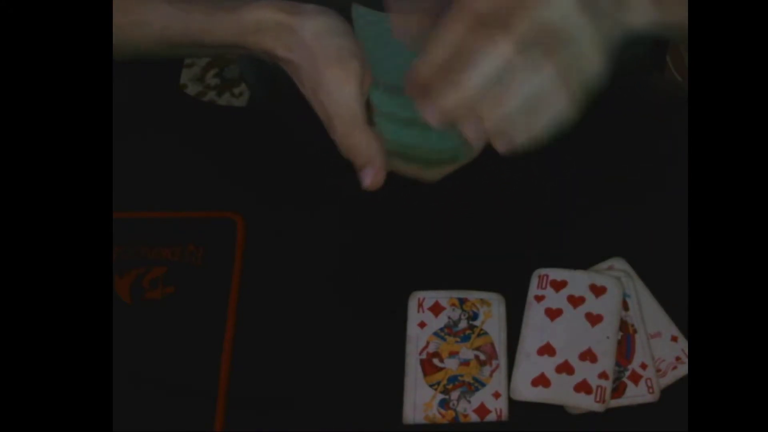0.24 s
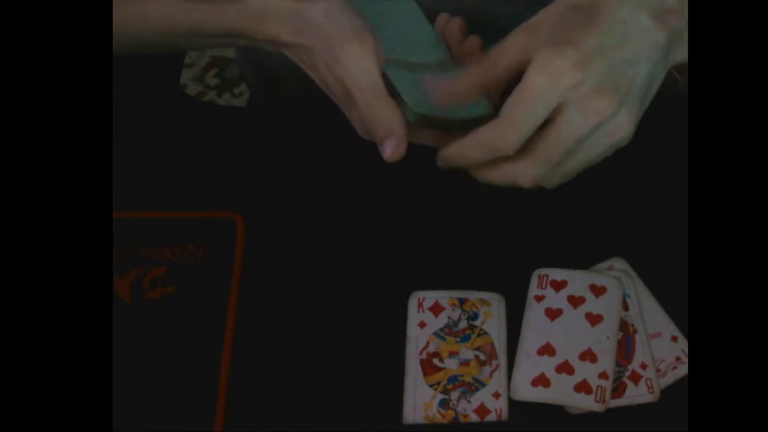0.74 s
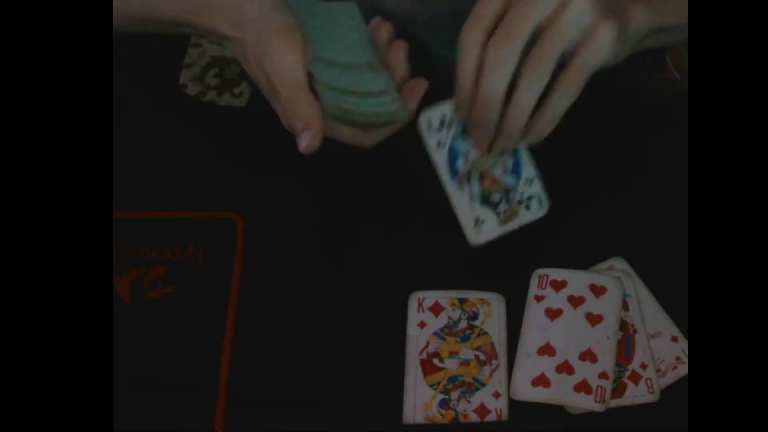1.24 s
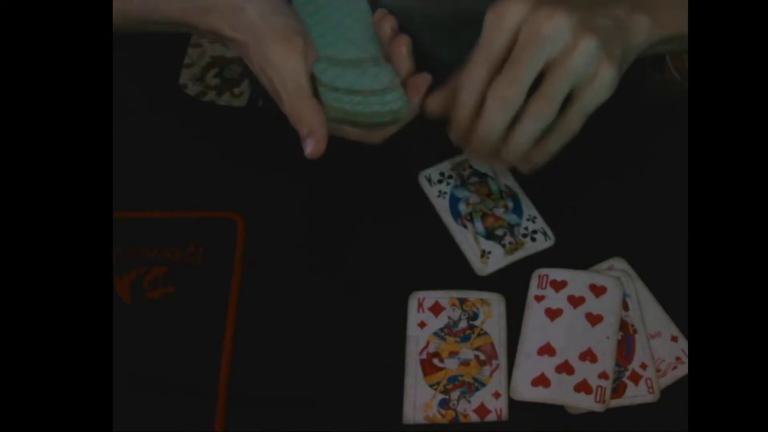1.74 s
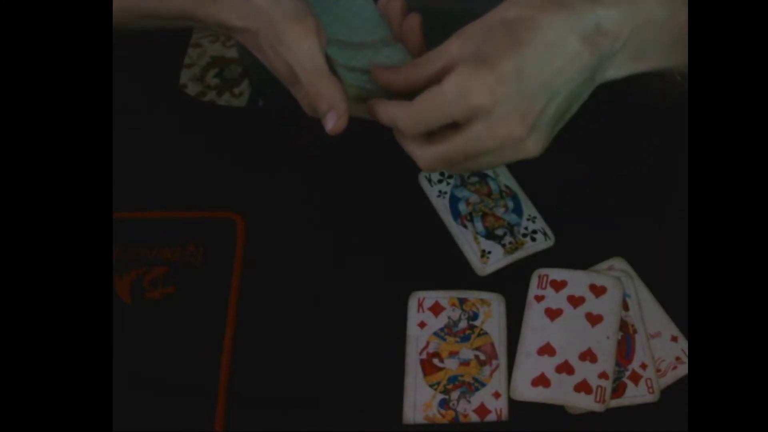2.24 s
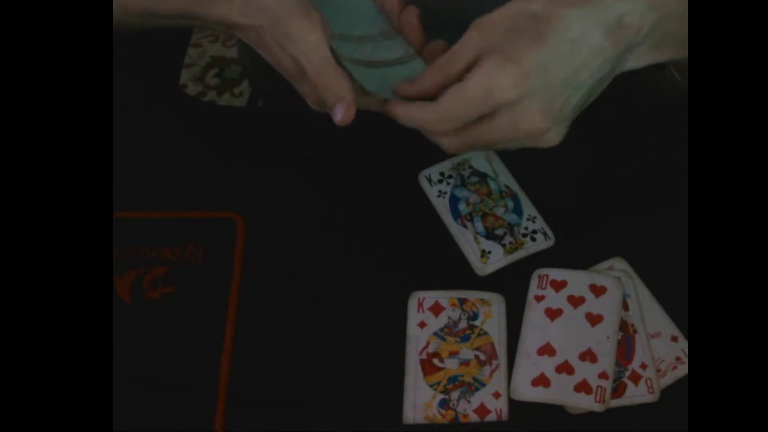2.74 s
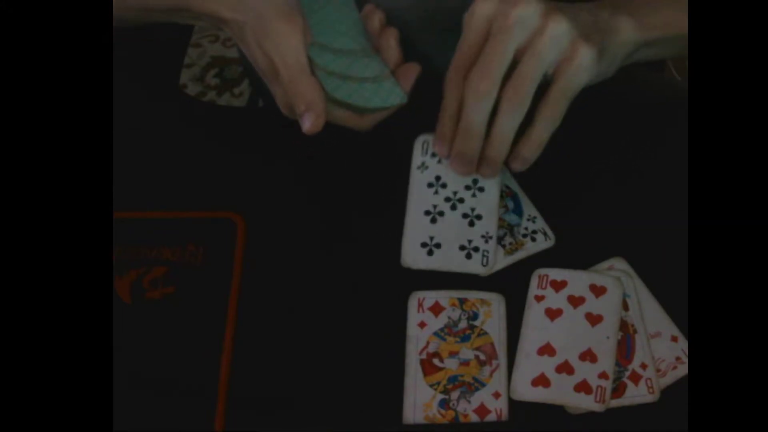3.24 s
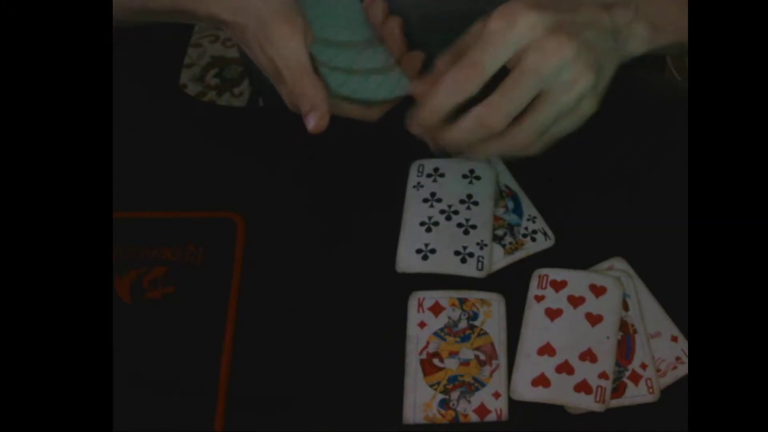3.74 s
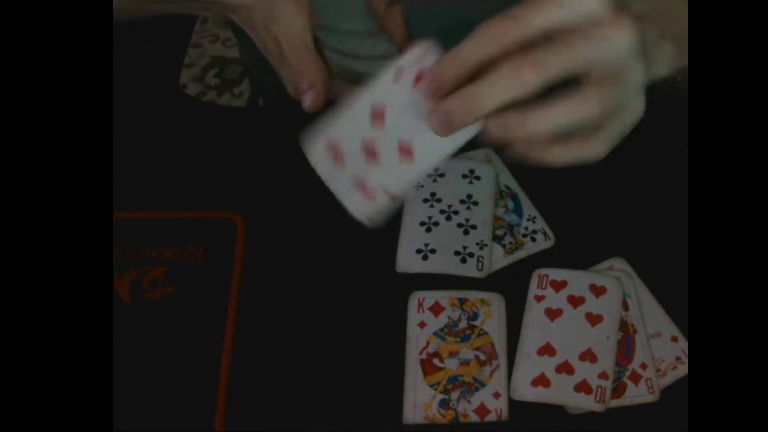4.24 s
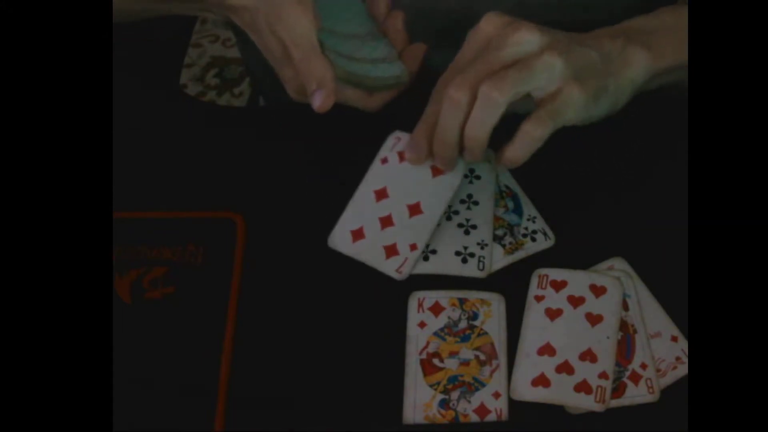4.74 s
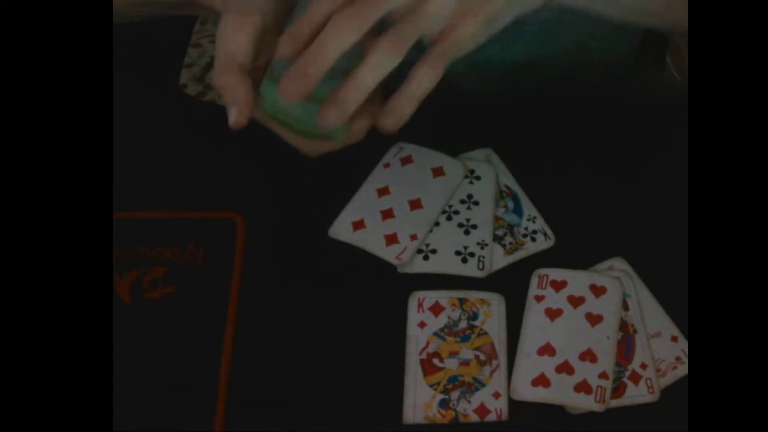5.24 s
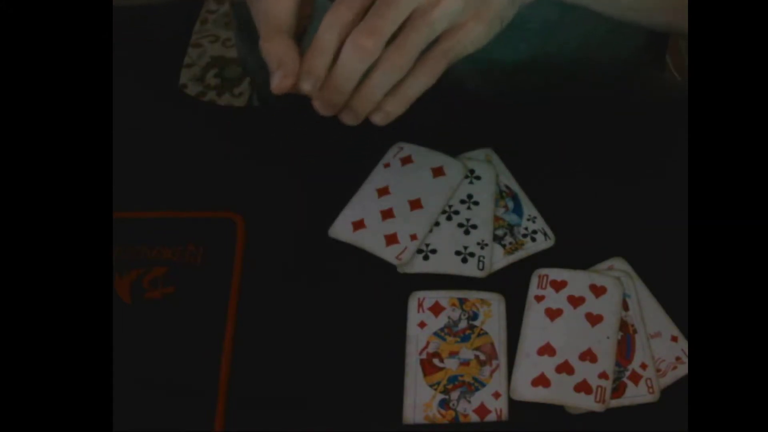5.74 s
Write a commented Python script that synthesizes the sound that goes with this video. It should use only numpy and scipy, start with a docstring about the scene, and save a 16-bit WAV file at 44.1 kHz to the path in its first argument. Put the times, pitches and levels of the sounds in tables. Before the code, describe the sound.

A quiet room with low rumble, faint hiss and a barely audible wavering hum, heard from close to a cloth-covered table. Around 0.5 to 0.9 s a card rubs lightly against the deck in short papery hisses; at about 0.95 s it springs free with a crisp double flap, with a dull hand rustle on the cloth. At 1.3 to 1.45 s it lands with a deep soft boom, a brief brushing and a sharp snap. Fingers slide again from 2.2 s, and near 2.8 s a second card comes away with a strong, very low thump; small ticks and a brush follow at 3.3 to 3.45 s. A third card slides and flaps at 4.1 s, then clicks down dryly at 4.9 s. From 5.2 s there are small flicks, scuffs and a muffled knock as the hands settle, ending with the heaviest sub-bass thud around 5.8 s.

```python
"""Quiet room, cloth-covered table: three playing cards are dealt close to the listener.
Each card hisses off the deck (friction noise), flaps free and snaps (struck damped modes), brushes the cloth.
A hand sweeps the cloth (dull noise). Hands bump the table: a very low boom (swelling sine) and a knock (modes).
Rumble and hiss (shaped noise) and a faint wavering hum (sines) lie underneath."""
import sys
import numpy as np
from scipy import signal
from scipy.fft import rfft, irfft
from scipy.io import wavfile
from scipy.ndimage import uniform_filter1d

SR = 44100
rng = np.random.default_rng(int(sys.argv[2]) if len(sys.argv) > 2 else 0)


def transcribe(signal):
    """Save signal, clipped to [-1, 1], as a 16-bit WAV file at the path in sys.argv[1]."""
    frames = np.atleast_2d(signal).T
    limited = np.clip(frames, -1, 1)
    pcm = np.round(limited * 32767).astype(np.int16)
    wavfile.write(sys.argv[1], SR, pcm)


N = 264159
TIME_S = np.arange(N) / SR

# background spectra, relative density: f/Hz, level/dB
RUMBLE_SPECTRUM = [(10, -14.5), (24, -2), (35, 5.5), (42, -1), (52, -16.5), (70, -20.5), (100, -20.5),
                   (140, -28.5), (170, -24), (210, -31), (300, -31.5), (400, -67.5), (700, -100)]
HISS_SPECTRUM = [(180, -40.5), (300, -4), (348, -4), (468, -1.5), (543, -10), (620, -8), (685, -9.5),
                 (849, -10), (1090, -14), (1490, -14), (1640, -14), (1970, -14.5), (15500, -18)]
RUMBLE_RMS_DB, HISS_RMS_DB = -53.5, -73
# hum partials: f/Hz, rms level/dB
HUM_PARTIALS = [(120, -70), (167, -78), (253, -85.5), (296, -102), (474, -100), (641, -92.5), (1518, -94.5)]

# fingers or hand landing on table: t/s, boom peak/dB, swell time/s, knock gain/dB, favoured knock pitch f/Hz
BUMPS = [(.87, -41.5, 0.044, -42, 110), (1.302, -34, 0.06, -42, 168), (1.331, -27.5, .073, -52, 130),
         (1.411, -50, 0.12, -47, 161), (2.795, -23.5, 0.053, -49.5, 127), (2.82, -70, 0.049, -41.5, 128),
         (5.204, -27, 0.068, -36, 84), (5.336, -33.5, 0.11, -46.5, 121), (5.519, -52, 0.057, -50.5, 155),
         (5.764, -19, 0.066, -47.5, 74)]
# wrist shifting its weight, hardly a knock: t/s, boom peak/dB
LEANS = [(.37, -44.5), (0.971, -45), (1.695, -42), (3.057, -42.5), (3.885, -40), (4.11, -47), (5.008, -39),
         (5.61, -38.5)]
LEAN_SWELL_S, LEAN_KNOCK_DB, LEAN_KNOCK_HZ = 0.061, -69, 115
BOOM_HZ = 36.56
# table-top modes: f/Hz, level/dB, t60/s
TABLE_MODES = [(63.3, 2.5, 0.23), (85.8, 8.5, 0.098), (109.7, -5, 0.23), (147, -14.5, 0.39), (165, 2, 0.22),
               (253.8, -7.5, 0.16), (350, -7, 0.093), (456.7, -7, 0.15)]

# card sliding over other cards: start t/s, fastest t/s, end t/s, hiss level/dB, flexing body level/dB
DRAWS = [(0.458, 0.551, .63, -62.5, -78), (0.76, 0.884, 0.93, -59, -70.5), (0.903, 0.937, .98, -61, -69),
         (.96, 1.01, 1.01, -72, -65.5), (2.237, 2.313, 2.31, -70.5, -76), (2.52, 2.572, 2.88, -77.5, -83),
         (2.648, 2.7, 2.74, -71.5, -77), (2.707, 2.752, 2.798, -60.5, -68.5),
         (3.808, 3.957, 4.2, -74, -81.5), (4.018, 4.082, 4.15, -60.5, -63.5),
         (4.634, 4.743, 4.775, -72.5, -74.5), (5.193, 5.228, 5.295, -62.5, -71)]
SPEED_POWER = 1.12  # slide amplitude goes as speed to this power
# relative density of slide hiss, of flexing card body: f/Hz, level/dB
DECK_HISS_SPECTRUM = [(710, -7.5), (1200, -15.5), (1460, -3), (1920, -7), (2090, -10.5), (5260, 2),
                      (6310, 2.5), (7480, 0.5), (8330, 1.5), (11500, 0.5), (15500, -14)]
CARD_BODY_SPECTRUM = [(250, -30), (600, -4), (1100, 1), (1600, 4.5), (2300, 3.5), (4000, -0.5), (8000, -31)]

# whole card flapping as it springs clear of the deck: t/s, level over 3 ms/dB, main pitch f/Hz
FLAPS = [(.612, -70, 1740), (0.9499, -58, 1570), (0.953, -48.5, 1340), (.963, -50.5, 1150),
         (0.9998, -62.5, 1250), (2.7947, -60, 1390), (4.095, -58.5, 1300), (4.1167, -50, 1560),
         (4.12, -64, 454), (5.2137, -64, 1720)]
FLAP_Q, FLAP_DECAY_S, FLAP_THUD_DB = 5.8, .0016, -11.5
# corner snapping off a finger or onto the table: t/s, level over 3 ms/dB, main pitch f/Hz, Q, scuff decay/s
SNAPS = [(0.7257, -60.5, 8000, .53, 0.0013), (0.9598, -54, 4850, 3.8, 0.0025),
         (1.0193, -57.5, 3970, 1.9, 0.0012), (1.039, -68, 5500, 2.6, .002),
         (1.2586, -63, 3360, .54, 0.0042), (1.3028, -67.5, 2800, 0.74, 0.00066),
         (1.414, -45, 4770, 4.2, 0.002), (1.425, -53.5, 3170, 0.59, 0.0036),
         (1.4367, -62, 5500, 3.8, 0.00074), (1.5845, -62, 4800, 1.9, .005),
         (3.4173, -57, 3800, 2.4, 0.0011), (3.4314, -59, 3520, 2.6, 0.0019),
         (3.456, -68, 4800, 0.68, 0.00072), (4.132, -57.5, 3800, 1.4, 0.01),
         (4.844, -63, 2820, 3.8, 0.00042), (4.8859, -45, 2550, 1.8, .0002),
         (5.202, -64, 1000, 0.56, 0.0012), (5.301, -66, 2750, 1.7, .003), (5.413, -71, 3700, 4.2, 0.0018),
         (5.525, -67, 3500, .5, .005)]
SNAP_THUD_DB = -19
# fingertip dragging across a card: t/s, level over 3 ms/dB, decay/s
SCUFFS = [(0.927, -58.5, .01), (.978, -69, 0.007), (1.589, -57, 0.026), (4.146, -64.5, .013),
          (5.395, -67.5, .01)]
SCUFF_HZ, SCUFF_Q = 1180, 1.8
# damped card modes: f/Hz, bandwidth/Hz, level/dB
CARD_MODES = [(406, 210, 8.5), (870, 360, 5), (1460, 310, -4), (3050, 1100, -3), (4330, 250, -10),
              (5110, 720, -19), (7450, 870, -9), (9300, 5100, -11)]

# hand sweeping low over the cloth: t/s, level/dB
SWEEP_LEVEL = [(.84, -95), (.89, -63.5), (1.0, -69), (1.25, -70), (1.33, -76), (1.45, -68), (1.6, -84)]
# relative density of the sweep: f/Hz, level/dB
SWEEP_SPECTRUM = [(60, -20), (150, 9), (270, -5.5), (420, -19), (800, -24), (3000, -35)]

# card brushing cloth and laid cards: start t/s, loudest t/s, end t/s, face level/dB, edge re face level/dB
BRUSHES = [(1.328, 1.346, 1.417, -63, 0), (1.39, 1.407, 1.5, -75, -11), (1.41, 1.442, 1.57, -81, 0),
           (3.317, 3.345, 3.48, -71, -13), (4.42, 4.486, 4.5, -80.5, 6), (5.23, 5.24, 5.28, -77, 0)]
# relative density of card on cloth: f/Hz, level/dB
CLOTH_SPECTRUM = [(800, -20), (2100, -14.5), (3200, -4.5), (4500, -3.5), (6200, -14), (9000, -11.5),
                  (15500, -33)]

# reflections off table top and nearby surfaces: delay t/s, level/dB
ECHOES = [(.0013, -30), (.0037, -20), (0.0098, -21), (0.0186, -35)]
# reverberation of the room: f/Hz, t60/s
ROOM_T60 = [(200, 1), (1500, 0.42), (4000, 0.14), (12000, 0.3)]
BAND_EDGE_HZ = 15750


def amp(db):
    """Decibels to gain."""
    return 10 ** (np.asarray(db) / 20)


def unit(x):
    """Scales to an rms of one."""
    return x / np.sqrt(np.mean(x ** 2) + 1e-20)


def read(points, hz):
    """Interpolates a table on a log-frequency axis."""
    f, value = np.transpose(points)
    return np.interp(np.log(hz + 1), np.log(f + 1), value)


def colour(x, spectrum):
    """Filters x by a spectrum, to an rms of one."""
    gain = amp(read(spectrum, np.fft.rfftfreq(len(x), 1 / SR)))
    return unit(irfft(rfft(x) * gain, len(x)))


def drift(rate_hz):
    """Slow random curve of rms one: noise low-passed near rate_hz."""
    hz = np.fft.rfftfreq(N, 1 / SR)
    lowpass = 1 / (1 + (hz / rate_hz) ** 4)
    return unit(irfft(rfft(rng.standard_normal(N)) * lowpass, N))


def add(mix, t_s, sound):
    """Adds a sound into the mix at t_s."""
    part = mix[max(round(t_s * SR), 0):][:len(sound)]
    part += sound[:len(part)]


def background(waver_rad=0.29):
    """Low rumble, microphone hiss and hum partials that share one fundamental's wavering phase scale."""
    rumble = amp(RUMBLE_RMS_DB) * colour(rng.standard_normal(N), RUMBLE_SPECTRUM)
    hiss = amp(HISS_RMS_DB) * colour(rng.standard_normal(N), HISS_SPECTRUM)
    hum = np.zeros(N)
    for hz, db in HUM_PARTIALS:
        waver = waver_rad * hz / HUM_PARTIALS[0][0] * drift(rate_hz=2.5)  # drawn anew per partial
        hum += amp(db) * np.sqrt(2) * np.sin(2 * np.pi * hz * TIME_S + waver)
    return rumble + hiss + hum


def bumps(sag=0.027, steepness=3, contact_s=0.017, spread_octaves=0.78):
    """A soft hand sets the whole table rocking; the first touch also knocks its top."""
    out, t = np.zeros(N), np.arange(SR) / SR
    leans = [(s, db, LEAN_SWELL_S, LEAN_KNOCK_DB, LEAN_KNOCK_HZ) for s, db in LEANS]
    for s, boom_db, swell_s, knock_db, knock_hz in BUMPS + leans:
        sway = (t / swell_s * np.exp(1 - t / swell_s)) ** steepness
        # the hand's weight slows the first swings
        turns = np.cumsum(BOOM_HZ * (1 - sag * np.exp(-t / swell_s))) / SR
        boom = sway * np.sin(2 * np.pi * turns)
        knock = np.zeros(SR)
        for hz, db, t60_s in TABLE_MODES:
            # the place of the touch favours modes near one pitch
            favour = 1 / (1 + (np.log2(hz / knock_hz) / spread_octaves) ** 2)
            knock += favour * amp(db - 60 * t / t60_s) * np.sin(2 * np.pi * hz * t)
        knock *= 1 - np.exp(-t / contact_s)  # soft contact
        add(out, s, -amp(boom_db) * boom - amp(knock_db) * knock)
    return out


def friction(slips_per_s, spread_db, judder_db):
    """Countless tiny slips of unequal size, bunched by the uneven grip of the fingers."""
    size = amp(spread_db * np.minimum(rng.exponential(1, N), 4))
    happens = rng.random(N) < slips_per_s / SR
    slips = happens * size * rng.choice([-1, 1], N)
    return slips * amp(judder_db * drift(rate_hz=61))


def bend(x, patchy_db):
    """The card's shape keeps changing under the fingers, so patches of its spectrum come and go."""
    z = signal.stft(x, SR, nperseg=256)[2]
    patches = rng.standard_normal(z.shape)
    for _ in range(2):
        patches = uniform_filter1d(patches, size=5, axis=0)  # over frequency
        patches = uniform_filter1d(patches, size=7, axis=1)  # over time
    bent = signal.istft(z * amp(patchy_db * unit(patches)), SR, nperseg=256)[1]
    return unit(bent[:N])


def draws():
    """A card speeds up and stops over other cards, hissing; as it bends, its whole face radiates lower down."""
    hiss_level, body_level = np.zeros((2, N))
    for start_s, fastest_s, end_s, hiss_db, body_db in DRAWS:
        speed = np.interp(TIME_S, [start_s, fastest_s, end_s], [0, 1, 0])
        rub = speed ** SPEED_POWER
        hiss_level += rub * amp(hiss_db)
        body_level += rub * amp(body_db)
    fine = colour(friction(slips_per_s=38000, spread_db=5.5, judder_db=1.5), DECK_HISS_SPECTRUM)
    coarse = colour(friction(slips_per_s=4500, spread_db=2.0, judder_db=3), CARD_BODY_SPECTRUM)
    return hiss_level * bend(fine, patchy_db=3.0) + body_level * bend(coarse, patchy_db=1.5)


def releases():
    """Every flap, snap and scuff as (t/s, level/dB, pitch f/Hz, Q, decay/s, recoil re tick/dB)."""
    flaps = [(s, db, hz, FLAP_Q, FLAP_DECAY_S, FLAP_THUD_DB) for s, db, hz in FLAPS]
    snaps = [(s, db, hz, q, decay_s, SNAP_THUD_DB) for s, db, hz, q, decay_s in SNAPS]
    scuffs = [(s, db, SCUFF_HZ, SCUFF_Q, decay_s, FLAP_THUD_DB) for s, db, decay_s in SCUFFS]
    return flaps + snaps + scuffs


def card_ring(t, edge_hz=10800):
    """Impulse response of the card's damped modes; blunt paper edges leave out the highest treble."""
    ring = np.zeros(len(t))
    for hz, width_hz, db in CARD_MODES:
        ring += amp(db) * width_hz * np.exp(-np.pi * width_hz * t) * np.cos(2 * np.pi * hz * t)
    return signal.sosfilt(signal.butter(4, edge_hz, fs=SR, output="sos"), ring)


def flicks(scuff=0.66, clean_s=0.0016, build_up=0.7, thud_hz=450):
    """An edge drags ever harder, lets go with one sharp slip and scuffs on, ringing the card's damped modes."""
    out, t = np.zeros(N), np.arange(4096) / SR
    ring = card_ring(t)
    release = len(t) // 4
    since_s = t - t[release]
    thud_band = signal.butter(2, [thud_hz / 2, thud_hz * 2], "band", fs=SR)
    for s, db, hz, q, decay_s, thud_db in releases():
        # a brief release is one clean snap, a long one is gritty
        grit = scuff * decay_s / (decay_s + clean_s)
        envelope = np.exp(-np.maximum(since_s, -since_s / build_up) / decay_s)
        push = grit * rng.standard_normal(len(t)) * envelope
        push[release] = 1
        # a long free span of card sounds low, a corner sounds high
        span = signal.iirpeak(hz, q, fs=SR)
        tick = signal.lfilter(*span, signal.fftconvolve(push, ring)[:len(t)])
        # the whole card recoils against what holds it
        thud = signal.lfilter(*thud_band, push)
        sound = unit(tick) + amp(thud_db) * unit(thud)
        to_3_ms = np.sqrt(.003 / t[-1])  # tick energy as if its level lasted 3 ms
        add(out, s - t[release], amp(db) * sound * to_3_ms)
    return out


def sweep():
    """The side of the hand rubs the cloth with a dull, low rustle."""
    s, db = np.transpose(SWEEP_LEVEL)
    level = np.interp(TIME_S, s, amp(db), left=0, right=0)
    return level * colour(rng.standard_normal(N), SWEEP_SPECTRUM)


def brushes():
    """The card is pushed a little way over the cloth, speeding up and stopping; its edge adds a finer hiss."""
    face = colour(friction(slips_per_s=11000, spread_db=-2.0, judder_db=-0.5), CLOTH_SPECTRUM)
    edge = colour(friction(slips_per_s=12000, spread_db=4.0, judder_db=6), DECK_HISS_SPECTRUM)
    out = np.zeros(N)
    for start_s, loudest_s, end_s, db, edge_db in BRUSHES:
        speed = np.interp(TIME_S, [start_s, loudest_s, end_s], [0, 1, 0])
        out += amp(db) * speed * (face + amp(edge_db) * edge)
    return out


def room(x, tail_db=-13.0, tail_delay_s=.009, taps_per_s=3000):
    """A few near reflections and a sparse random tail whose decay time depends on frequency."""
    taps = rng.choice([-1., 1.], SR // 2) * (rng.random(SR // 2) < taps_per_s / SR)
    hz, t, z = signal.stft(taps, SR, nperseg=256)
    decay = amp(-60 * t / read(ROOM_T60, hz)[:, None])
    tail = signal.istft(z * decay, SR, nperseg=256)[1]
    response = np.zeros(SR)
    add(response, tail_delay_s, amp(tail_db) * tail / np.linalg.norm(tail))
    for delay_s, db in ECHOES:
        add(response, delay_s, amp(db) * np.array([1, 2, 1]) / 4)  # slightly dulled
    return x + signal.fftconvolve(x, response)[:N]


def scene():
    """Card sounds in the room, plus the hand sweep, table bumps and background."""
    cards = draws() + flicks() + brushes()
    return (background() + bumps() + room(cards) + sweep())[None]


def record(dry):
    """The recorder's band limit: linear-phase low-pass."""
    lowpass = signal.firwin(511, BAND_EDGE_HZ, window=("kaiser", 9), fs=SR)
    return signal.oaconvolve(dry, lowpass[None], "same")


dry = scene()
out = record(dry)
transcribe(out)
```